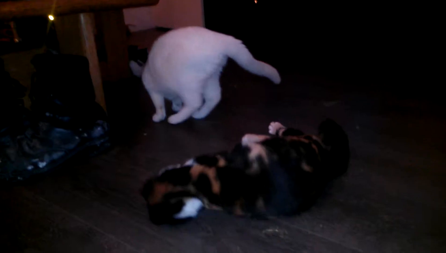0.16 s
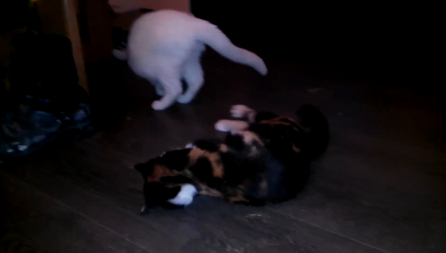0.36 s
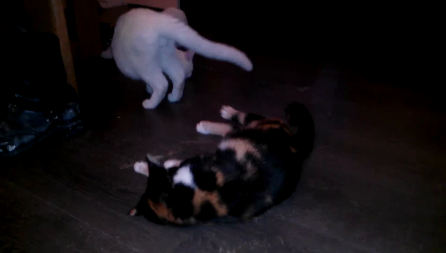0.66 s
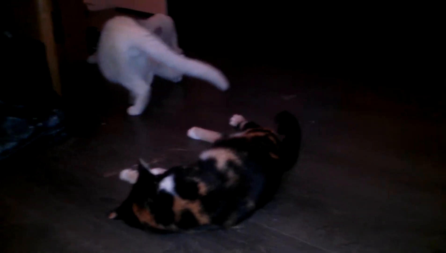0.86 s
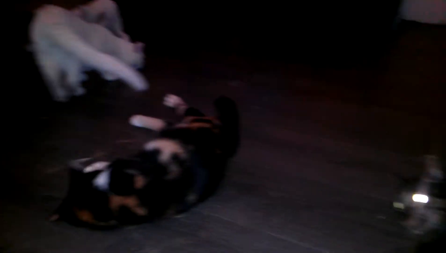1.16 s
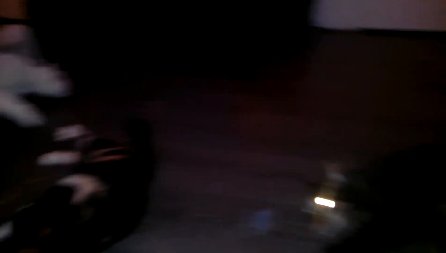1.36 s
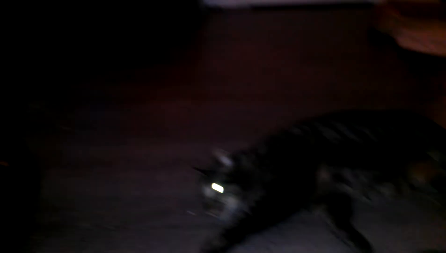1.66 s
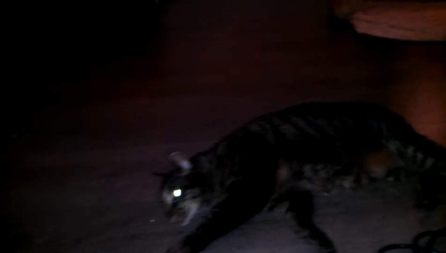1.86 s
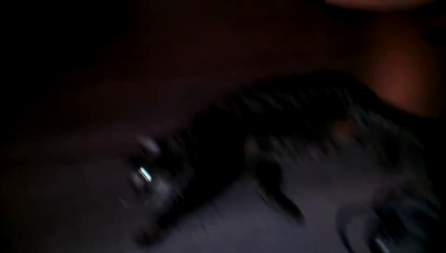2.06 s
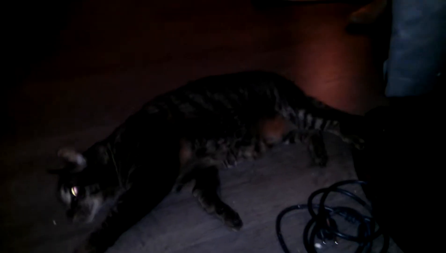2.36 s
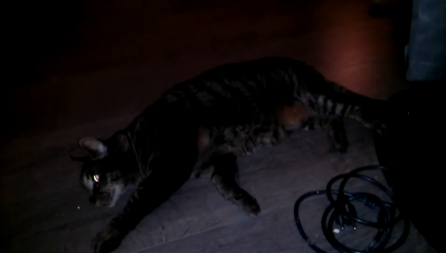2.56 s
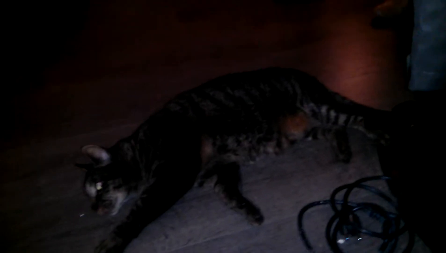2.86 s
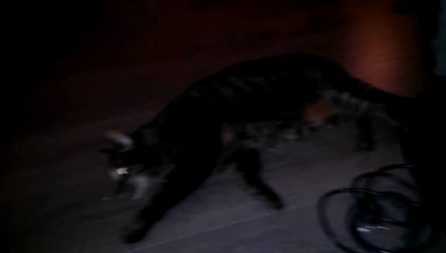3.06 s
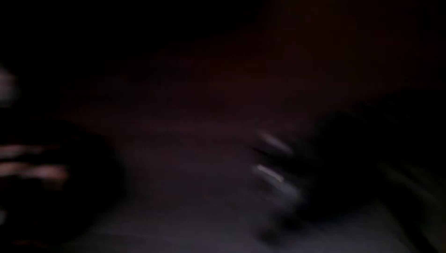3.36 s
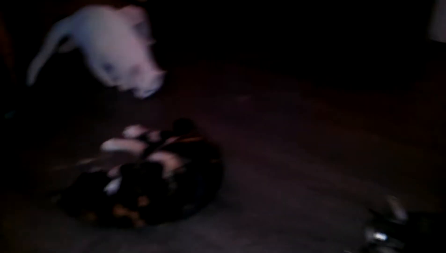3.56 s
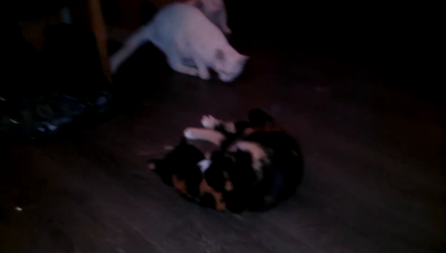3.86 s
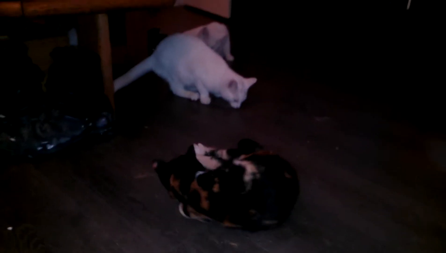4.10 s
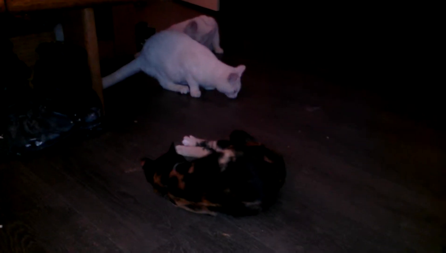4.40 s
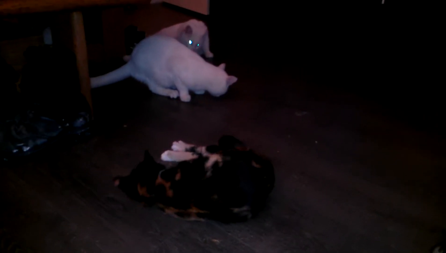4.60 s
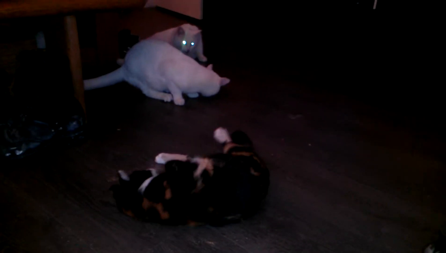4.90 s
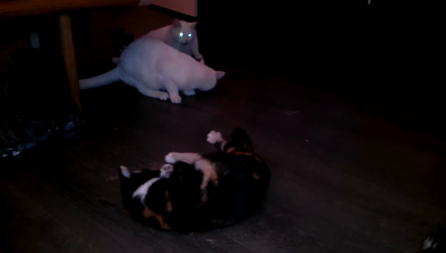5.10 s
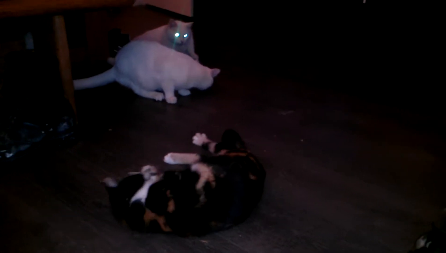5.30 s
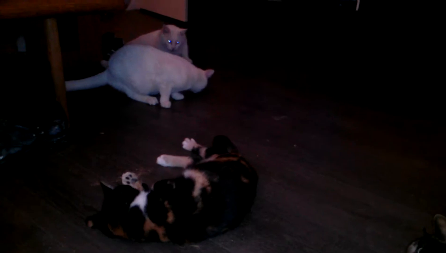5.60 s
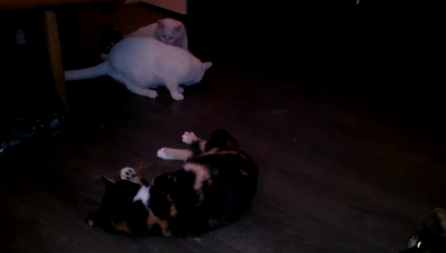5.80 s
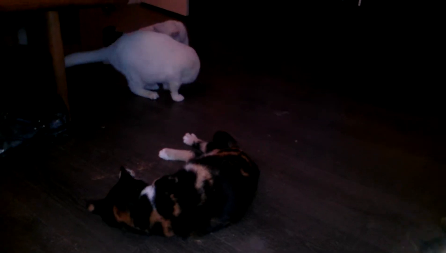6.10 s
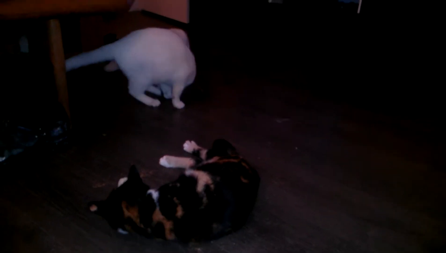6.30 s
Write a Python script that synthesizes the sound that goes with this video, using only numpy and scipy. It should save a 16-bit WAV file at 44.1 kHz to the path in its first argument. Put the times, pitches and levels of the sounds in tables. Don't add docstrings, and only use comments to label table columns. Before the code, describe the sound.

A quiet room with steady microphone hiss and very faint mains hum; cats move on wooden boards close to a small mono microphone. A soft low thump opens, with faint distant cardboard rustles over the first second. Around 1.1 s claws snap and scratch with blunt pops, and at 1.3-1.45 s comes the loudest event: a rough, heavy scuff with hard woody thumps. A light tick follows at 1.65 s, a sharp pop at 1.94 s, and airy fur brushing around 2-2.3 s. It quiets until 3.2 s, then fur sweeps build to a bright swish at 3.5 s and fade. Small ticks, a click at 4.2 s and soft pats near 4.3-4.55 s are sparse. From 5 s claw clicks gather, bursting into dry crackling scrabble and thuds at 5.7 s. Faint rubbing leads to a dull knock at 6.25 s and two last clicks.

```python
import sys
import numpy as np
from scipy import signal
from scipy.fft import rfft, irfft, next_fast_len
from scipy.io import wavfile
from scipy.ndimage import uniform_filter1d, minimum_filter1d, map_coordinates

SR = 44100
rng = np.random.default_rng(int(sys.argv[2]) if len(sys.argv) > 2 else 0)


def store_wav(level_fs):
    pcm = np.round(np.clip(np.atleast_2d(level_fs), -1, 1) * 32767)
    wavfile.write(sys.argv[1], SR, pcm.T.astype(np.int16))


def linear_from_db(decibels):
    return 10 ** (np.asarray(decibels, float) / 20)


N = 284445
STROKE_STEP = 32


def unit(x):
    return x / np.sqrt(np.mean(x ** 2) + 1e-20)


def along(points, hz):
    f, v = np.transpose(points)
    return np.interp(np.log(hz + 1), np.log(f + 1), v)


def level_curve(points):
    s, db = np.transpose(points)
    return np.interp(np.arange(N) / SR, s, db)


def wobble(rate):
    knots = rng.standard_normal(int(N * rate / SR) + 4)
    return map_coordinates(knots, [np.arange(N) * rate / SR])


def filtered(x, response):
    m = next_fast_len(N + 8192)
    return irfft(rfft(x, m) * response(np.fft.rfftfreq(m, 1 / SR)), m)[:N]


def coloured(x, spectrum):
    return unit(filtered(x, lambda f: linear_from_db(along(spectrum, f))))


def mode(f, hz, width_hz):
    return 1j * f * width_hz / (hz * hz - f * f + 1j * f * width_hz)


def grains(spiky_db, clump_db, clump_rate):
    excess = np.minimum(rng.exponential(size=N), 5)
    size = linear_from_db(spiky_db * excess + clump_db * wobble(clump_rate))
    return unit(size * rng.standard_normal(N))


def strokes(rows):
    s, db, rise, fall = np.transpose(rows)[:4, :, None]
    late = np.arange(0, N + STROKE_STEP, STROKE_STEP) / SR - s
    roundness = 1.3
    return linear_from_db(db - 20 * np.where(late < 0, -late / rise, late / fall) ** roundness)


def per_sample(values):
    return np.interp(np.arange(N) / STROKE_STEP, np.arange(len(values)), values)


def joined(gains, bed_db):
    return per_sample(np.sqrt(np.sum(gains ** 2, axis=0) + linear_from_db(bed_db) ** 2))


def add(track, s, sound):
    part = track[max(round(s * SR), 0):][:len(sound)]
    part += sound[:len(part)]


def room_tone():
    # hz, density_db
    hiss_spectrum = [(90, -34.5), (150, -1), (300, -5), (900, -8.5), (2000, -7.5), (4400, -10), (6600, -10),
                     (8000, -13.5), (10000, -20.5), (13000, -9), (16000, -9)]
    # pitch_hz, level_db, wander_hz
    hum_partials = [(50, -58.5, 8.3), (100.8, -61, 5.7), (201, -65, 4.9)]
    t = np.arange(N) / SR
    hum = np.zeros(N)
    for hz, db, wander_hz in hum_partials:
        level = linear_from_db(db + 2.9 * wobble(wander_hz))
        hum += level * np.sin(2 * np.pi * hz * t + 0.4 * wobble(wander_hz))
    hiss = coloured(rng.standard_normal(N), hiss_spectrum)
    return hum + linear_from_db(-61.5 + 0.6 * wobble(3)) * hiss


def card():
    # peak_s, level_db, rise_s and fall_s per 20 dB
    drags = [
        (.04, -54, .1, .4),
        (.16, -52, .3, .03),
        (.208, -48, .045, .1),
        (.42, -58, .05, .1),
        (.505, -51.5, .1, .25),
        (.8, -59, .06, .7),
        (1.1, -56, .4, .04),
    ]
    # centre_hz, width_hz, level_db
    sheet_modes = [(2810, 450, 2), (5000, 540, -9), (6500, 731, -11)]
    # time_s, level_db
    edge_level = [(0, -90), (.88, -90), (.93, -62), (1.05, -64), (1.08, -90)]
    rub = grains(spiky_db=6.0, clump_db=1, clump_rate=72)

    def hollow(f):
        return sum((-1) ** k * linear_from_db(db) * mode(f, hz, width) for k, (hz, width, db) in enumerate(sheet_modes))

    edge = linear_from_db(level_curve(edge_level)) * unit(filtered(rub, lambda f: mode(f, 2110, 25)))
    return joined(strokes(drags), -120) * unit(filtered(rub, hollow)) + edge


def fur():
    # peak_s, level_db, rise_s and fall_s per 20 dB, colour_hz
    fur_strokes = [(.02, -45, .02, .08, 6100), (.204, -52.5, .2, .23, 5440), (.496, -55.5, .22, .45, 5340),
                   (.86, -55.5, .25, .2, 6300), (.99, -54, .2, .1, 6100), (1.1, -54, .06, .08, 4600),
                   (1.135, -42, .008, .04, 5000), (1.17, -32, .025, .11, 5200), (1.24, -42, .05, .1, 4900),
                   (1.379, -19.5, .11, .09, 4800), (1.44, -26, .1, .05, 5700), (1.52, -48, .05, .12, 6200),
                   (4.27, -48, .04, .12, 4930), (4.58, -58.5, .15, .17, 5730),
                   (5.075, -59, .4, .064, 4900), (5.24, -52, .016, .067, 4950),
                   (5.35, -41, .025, .085, 4400), (5.615, -45, .11, .09, 4950),
                   (5.742, -48.5, .15, .1, 4780),
                   (1.651, -37, .01, .007, 6210), (2.035, -43.5, .62, .1, 6700),
                       (2.055, -36.5, .015, .14, 6000), (2.23, -37, .075, .075, 5800),
                       (2.3, -56, .1, .16, 6090), (2.58, -53.5, .015, .053, 6370),
                       (3.19, -45, .015, .1, 5500), (3.245, -43, .07, .025, 5500), (3.3, -56, .3, .3, 6000),
                       (3.4, -39, .08, .2, 5500), (3.495, -25.5, .1, .14, 5600),
                       (3.58, -36, .1, .065, 5700), (3.685, -43, .02, .06, 5900),
                       (3.717, -38, .05, .045, 6000), (3.92, -45, .25, .17, 6030),
                       (4.07, -53, .1, .12, 6000)]
    # hz, level_db
    brush_skirt = [(300, -40.5), (900, -42), (1800, -12), (3500, -5), (7000, -9), (8500, -20.5),
                   (16000, -26)]
    # hz, level_db
    fizz_spectrum = [(6000, -25), (8300, -4), (10500, -4.5), (13000, -8.5), (16000, -10)]
    # time_s, level_db
    static_level = [(0, -73), (2.4, -85), (5.6, -85), (5.82, -68), (6.45, -72)]
    rows = np.array(fur_strokes)
    gains, stroke_hz = strokes(rows), rows[:, 4:]
    power = gains ** 2
    colour_hz = per_sample(np.sum(power * stroke_hz, axis=0) / np.sum(power, axis=0))

    hairs = grains(spiky_db=2.5, clump_db=0.5, clump_rate=180)
    centres = np.array([4200, 5300, 6300, 7300])
    position = np.interp(colour_hz, centres, np.arange(4))
    hiss = np.zeros(N)
    for k, hz in enumerate(centres):
        share = np.sqrt(np.clip(1 - abs(position - k), 0, 1))
        band = filtered(hairs, lambda f: mode(f, hz, 2000) ** 2 + linear_from_db(along(brush_skirt, f)))
        hiss += share * unit(band)

    fizz = coloured(grains(spiky_db=2.5, clump_db=0.5, clump_rate=93), fizz_spectrum)
    fizz_db = -14.5 + 10 * (np.minimum(stroke_hz, 5800) - 5500) / 1000
    fizz_gain = np.hypot(joined(gains * linear_from_db(fizz_db), -85), linear_from_db(level_curve(static_level)))
    flutter = linear_from_db(1.3 * wobble(30))
    return flutter * (0.74 * joined(gains, -73) * hiss + fizz_gain * fizz)


def scuff():
    # peak_s, level_db, rise_s and fall_s per 20 dB, board_weight_db
    body_slides = [(.06, -57.5, .2, .3, 0), (.198, -54, .3, .19, -7), (.318, -65, .05, .1, 7),
                   (.51, -62, .6, .6, -1.5), (.9, -61, .4, .5, 0), (1.131, -40.5, .008, .03, 2.5),
                   (1.169, -33, .02, .13, -1.5), (1.235, -42, .04, .06, 4), (1.355, -19, .065, .08, 1),
                   (1.397, -18, .12, .03, -1), (1.42, -27, .04, .08, -6), (4.29, -56.5, .09, .13, 4),
                   (4.535, -64, .03, .07, 8), (4.97, -62, .15, .35, .6), (5.25, -55, .04, .07, -12),
                   (5.355, -43, .03, .08, -4), (5.38, -48, .03, .02, 5), (5.59, -46, .07, .2, -14),
                   (5.64, -42.5, .07, .1, -1.5), (5.71, -39, .06, .06, -3), (5.748, -30.5, .015, .035, -10),
                   (5.775, -42, .03, .04, -6), (5.81, -52, .05, .12, -3), (5.97, -57, .05, .2, 3),
                   (6.16, -54.5, .25, .4, 4), (6.21, -52, .1, .04, -3), (6.252, -43, .06, .035, 3),
                   (1.99, -54, .65, .2, -1.5), (2.07, -58, .1, .2, -3), (2.25, -56.5, .15, .3, 0),
                      (2.58, -63, .03, .5, 1.5), (3.19, -49, .02, .1, -21), (3.24, -45, .08, .03, -19),
                      (3.38, -44.5, .06, .12, -15), (3.47, -44.5, .15, .13, -21), (3.62, -66, .04, .05, 4),
                      (3.69, -56, .04, .1, -5), (3.9, -53, .32, .46, -7), (4.06, -59, .04, .1, .6)]
    # peak_s, level_db, rise_s and fall_s per 20 dB
    weight_shifts = [(.1, -48, .4, .4), (.8, -49, .6, .8), (1.165, -33, .02, .1), (1.39, -31, .3, .09),
                     (1.8, -52, .9, .5), (2.07, -46.5, .2, .3), (3.27, -48, .15, .3), (3.44, -46, .1, .1),
                     (3.63, -48, .06, .15), (3.8, -50, .1, .1), (4.03, -46, .3, .08),
                     (4.284, -46, .14, .22), (4.55, -46, .1, .1), (4.9, -56, .3, .3), (5.27, -48, .07, .05),
                     (5.63, -39, .15, .2), (5.715, -29, .046, .034), (5.746, -38, .02, .07),
                     (5.84, -46, .2, .1), (6.1, -54, .5, .9), (6.225, -42, .1, .2)]
    # hz, level_db
    scrape_spectrum = [(450, -14.5), (800, -5.5), (1150, 3.5), (2000, 0), (3200, -3), (5000, -9),
                       (8000, -27.5), (16000, -44.5)]
    board_spectrum = [(90, -26), (170, -4.5), (350, .5), (650, -0.5), (950, -3.5), (1600, -41),
                      (16000, -73.5)]
    rumble_spectrum = [(12, -19), (28, 4.5), (55, -3.5), (110, -4.5), (170, -10), (300, -19), (16000, -100)]
    rows = np.array(body_slides)
    gains = strokes(rows)
    slips = grains(spiky_db=2, clump_db=1.3, clump_rate=200)
    jolts = grains(spiky_db=1, clump_db=1.5, clump_rate=70)
    shakes = grains(spiky_db=3.4, clump_db=2, clump_rate=15)
    scrape = joined(gains, -72) * coloured(slips, scrape_spectrum)
    boards = joined(gains * linear_from_db(rows[:, 4:]), -72) * coloured(jolts, board_spectrum)
    rumble = joined(strokes(weight_shifts), -58) * coloured(shakes, rumble_spectrum)
    return scrape + boards + rumble


def claws():
    # start_s, level_db, centre_hz
    ticks = [(.0154, -27.5, 3200), (1.127, -30, 4000), (1.233, -23.5, 1900), (1.646, -27, 5750),
             (1.805, -30, 4500), (1.855, -36.5, 4480), (3.183, -36, 4000), (3.675, -31, 5000),
             (3.843, -33, 4500), (4.32, -42, 4500), (4.519, -45, 700), (4.554, -31, 4380),
             (4.757, -52, 4500), (5.3805, -32, 2500), (5.341, -36, 3480), (5.684, -26, 2300),
             (6.154, -44, 2480)]
    # start_s, level_db, centre_hz, t60_s
    swipes = [(.473, -49.5, 5500, .1), (1.157, -27, 3520, .062), (1.169, -20, 5200, .071),
              (2.046, -28, 5550, .15), (2.587, -48.5, 5000, .06), (3.218, -34, 4500, .09),
              (4.272, -45.5, 4500, .067), (5.232, -37.5, 4400, .05), (5.526, -48.5, 3000, .064),
              (5.567, -48.5, 3000, .04), (5.685, -27, 500, .05), (5.954, -50, 1500, .05),
              (6.246, -31.5, 500, .044), (6.247, -26.5, 1200, .04)]
    # start_s, level_db, centre_hz
    clicks = [(.7344, -46, 1000), (1.1284, -17, 2200), (1.939, -30, 2800), (4.0664, -37, 2500),
              (4.1965, -30, 1600), (4.7595, -37, 4800), (4.844, -36, 5500), (4.8463, -29, 4500),
              (5.0318, -25, 3600), (5.2532, -21.5, 3500), (5.3394, -26, 4000), (5.352, -26, 3500),
              (5.3808, -19, 4500), (5.4121, -29, 3500), (5.4467, -38, 2800), (5.584, -30, 4000),
              (5.622, -29, 4000), (5.6843, -18, 3000), (5.6862, -16, 2600), (5.7, -19, 3500),
              (5.7271, -15, 3200), (5.7316, -25, 3200), (5.746, -22, 2200), (5.7644, -21, 4500),
              (6.2347, -27, 1500), (6.2841, -27, 4000), (6.2942, -26, 2600)]
    contacts = [(*row, 0.025, 0.0015) for row in ticks]  # t60_s, rise_s
    contacts += [(*row, 0.003) for row in swipes]
    out, t = np.zeros(N), np.arange(SR // 8) / SR
    f = np.fft.rfftfreq(len(t), 1 / SR)
    for s, db, hz, t60, rise in contacts:
        grit = rng.standard_normal(len(t))
        puff = unit(irfft(rfft(grit) * mode(f, hz, 1.2 * hz), len(t)))
        decay = linear_from_db(db - 60 * np.clip(t - rise, 0, 1) / t60)
        add(out, s, decay * np.clip(t / rise, 0, 1) * puff)
    for s, db, hz in clicks:
        snap = irfft(mode(f, hz, 1.35 * hz), len(t))[:SR // 100]
        add(out, s, linear_from_db(db) * snap / snap.max())
    return out


def paws():
    # start_s, level_db, pitch_hz, first_swing_sign
    thumps = [(.0172, -20.5, 109, 1), (1.358, -2, 113.4, -1), (1.4037, .6, 164, -1), (1.65, -34.5, 54, 1),
              (3.612, -35, 38, -1), (3.681, -32, 60, -1), (3.845, -34, 300, -1), (4.32, -35, 70, 1),
              (4.536, -38, 200, 1), (4.554, -24, 77.1, 1), (1.341, -12, 150, -1), (1.331, -16, 200, -1),
              (5.232, -24, 48, 1), (5.242, -25, 38, -1), (5.342, -25, 36, -1), (5.364, -30, 60, 1),
              (5.6975, -15, 135, 1), (5.7005, -16, 110, -1), (5.745, -21, 40, 1), (5.757, -15, 62, -1),
              (6.25, -22, 94, 1), (6.253, -11, 290, 1), (6.265, -26, 300, 1), (6.234, -24, 400, 1),
              (4.064, -28, 197, 1)]
    # start_s,
    # level_db, pitch_hz, t60_s
    knocks = [(1.391, -4.5, 659, .07), (1.392, -9, 900, .05), (1.394, -14.5, 490, .04),
              (2.588, -47.5, 637, .084), (3.537, -45, 470, .04), (3.63, -40, 540, .04),
              (3.7, -46, 750, .03), (4.521, -37, 220, .048), (.066, -30, 38, .16),
              (5.3793, -21, 1400, .014), (5.685, -21.5, 610, .037), (5.686, -6, 88, .0143),
              (5.7471, -12, 1600, .014), (6.2492, -21.5, 183, .067), (6.2498, -16.5, 656, .033)]
    # start_s, level_db, first_swing_sign
    sways = [
        (.019, -23, -1),
        (.553, -42, -1),
        (3.205, -33, 1),
        (1.361, -21, 1),
    ]
    landings = [(s, db, hz, 3.3 / hz, sign) for s, db, hz, sign in thumps]
    landings += [(*row, 1) for row in knocks]
    landings += [(s, db, 45, 0.19, sign) for s, db, sign in sways]  # pitch_hz, t60_s
    out, t = np.zeros(N), np.arange(SR // 3) / SR
    for s, db, hz, t60, sign in landings:
        soft_start = 1 - np.exp(-t / 0.00034)
        swing = linear_from_db(db - 60 * t / t60) * soft_start * np.sin(2 * np.pi * hz * t)
        add(out, s, np.sign(sign) * swing)
    return out


def pops():
    # snap_s, swing_before, swing_after, build_s, release_s
    buckles = [
        (1.089, -0.08, .07, .0015, .003),
        (1.1283, -.08, .09, .0004, .0012),
        (1.1577, 0.3, -.19, .0007, .0027),
        (1.9391, .2, -.25, .0007, .00075),
        (4.1964, 0.043, .025, .0004, .0004),
    ]
    out, t = np.zeros(N), np.arange(-SR // 50, SR // 50) / SR
    snap = 0.5 + 0.5 * np.tanh(t / 0.00033)
    for s, before, after, build, release in buckles:
        bend = before * (1 - snap) * np.exp(-abs(t) / build)
        relax = after * snap * np.exp(-(t / release) ** 2)
        add(out, s + t[0], bend + relax)
    return out


def gated_treble(x):
    # start_s, end_s, highest_hz still heard
    dropouts = [
        (1.078, 1.112, 9200),
        (1.225, 1.25, 13000),
        (1.43, 1.47, 12800),
        (4.175, 4.205, 9000),
        (5.667, 5.7, 7300),
        (5.7, 5.74, 9300),
        (5.772, 5.785, 7800),
        (6.243, 6.273, 5800),
    ]
    hz, t, z = signal.stft(x, SR, nperseg=512)
    cell = uniform_filter1d(uniform_filter1d(abs(z) ** 2, size=3, axis=0), size=3, axis=1)
    around = uniform_filter1d(uniform_filter1d(cell, size=15, axis=0), size=9, axis=1)
    threshold_db = along([(8500, -90), (9500, -11), (12300, -10), (13200, -4.5), (16000, -4)], hz)
    audible = cell > linear_from_db(threshold_db)[:, None] * around
    keep = minimum_filter1d(audible, size=2, axis=1) & (hz < 15830)[:, None]
    for start, end, highest in dropouts:
        keep[np.ix_(hz > highest, (t > start) & (t < end))] = False
    return signal.istft(z * keep, SR, nperseg=512)[1][:N]


def scene():
    # hz, level_db
    port_spectrum = [(15, -7), (40, 3), (6500, -3.5), (8000, -14.5), (16000, -21.5)]
    steady = room_tone() + card() + fur() + scuff()
    sharp = claws() + paws() + pops()
    mono = steady + filtered(sharp, lambda f: linear_from_db(along(port_spectrum, f)))
    return np.array([mono, mono])


def roll_off(x):
    return signal.sosfilt(signal.butter(12, 16360, fs=SR, output="sos"), x)


def record(dry):
    limited = dry[0] / (1 + abs(dry[0] / 0.98) ** 6) ** (1 / 6)
    mono = gated_treble(limited)
    residue_spectrum = [(500, -64), (1500, -33), (3000, -27), (6000, -27), (14000, -17)]  # hz, level_db
    residue = filtered(mono, lambda f: linear_from_db(along(residue_spectrum, f)))
    apart = residue * np.sign(wobble(150))
    return roll_off(np.array([mono + apart, mono - apart]))


dry = scene()
out = record(dry)
store_wav(out)
```